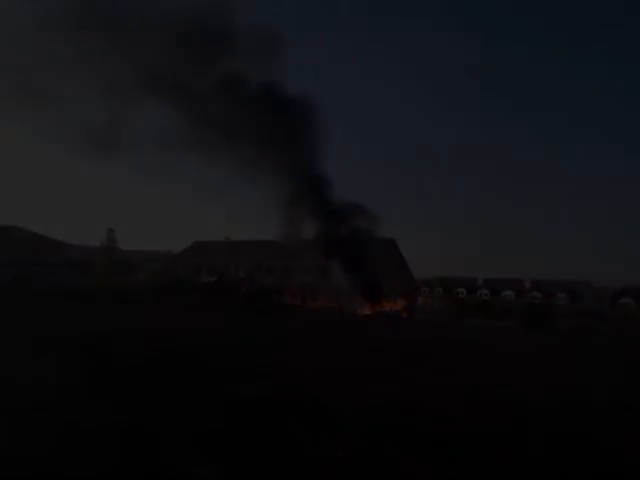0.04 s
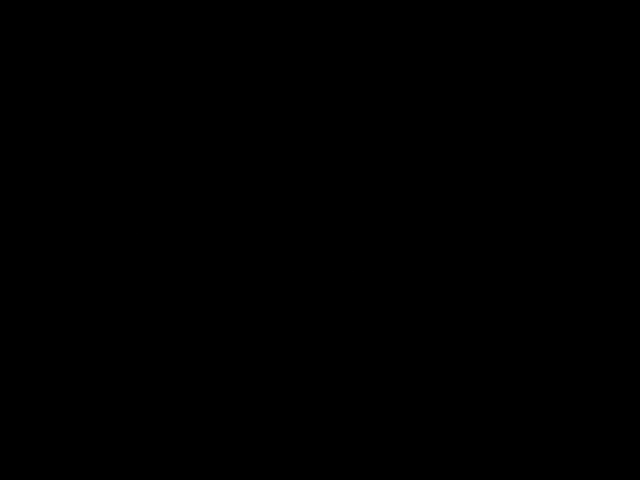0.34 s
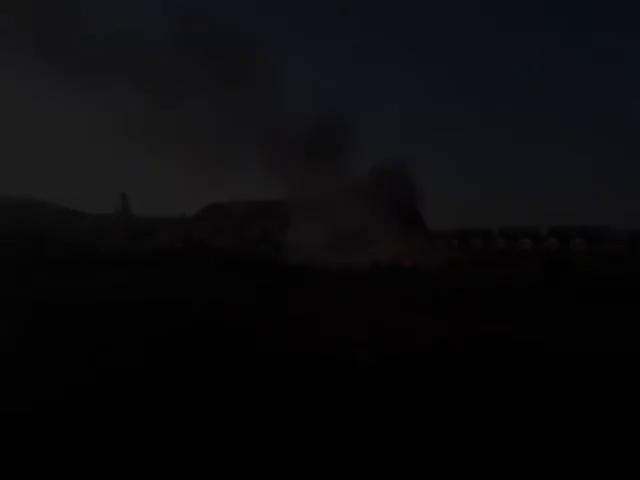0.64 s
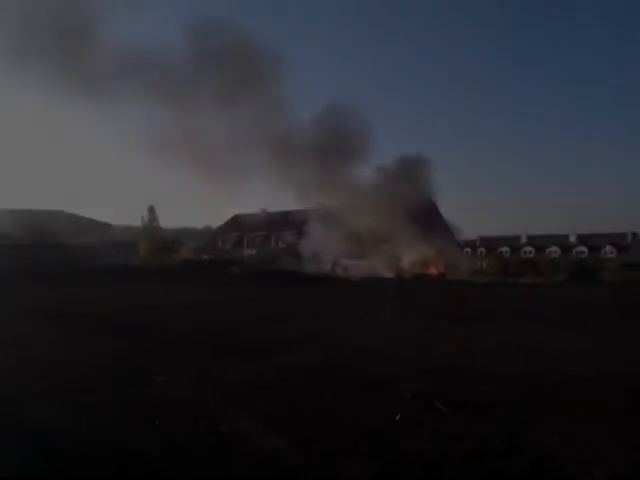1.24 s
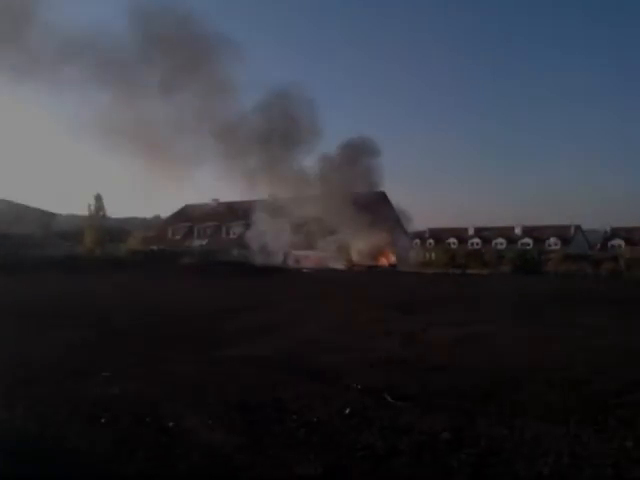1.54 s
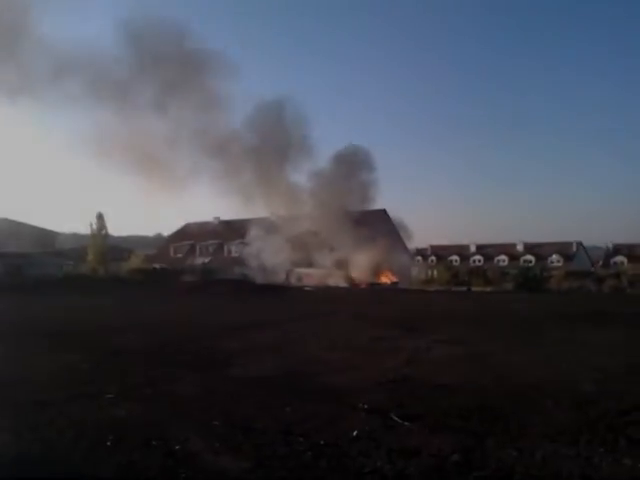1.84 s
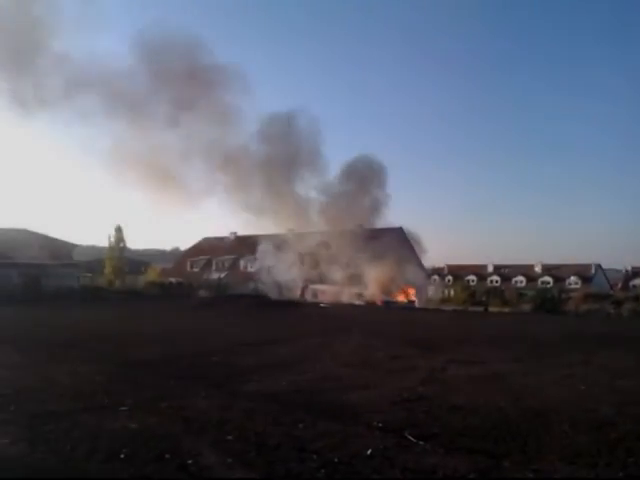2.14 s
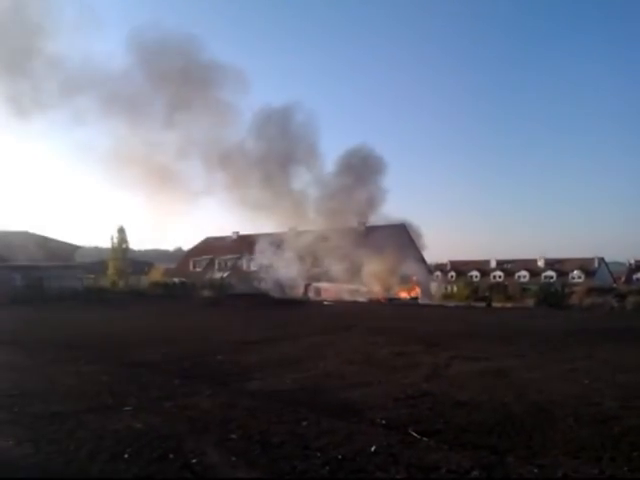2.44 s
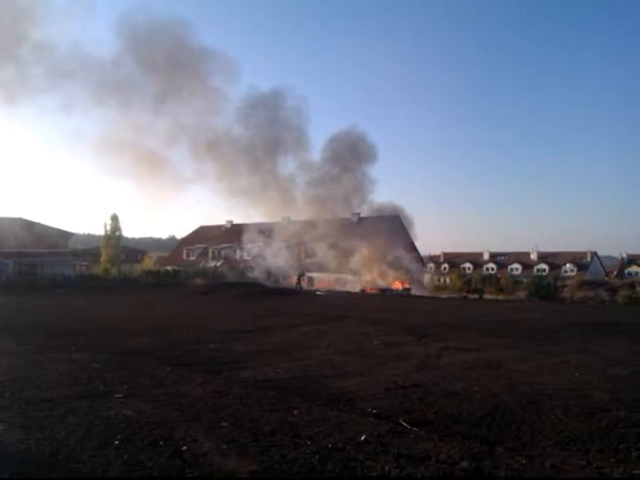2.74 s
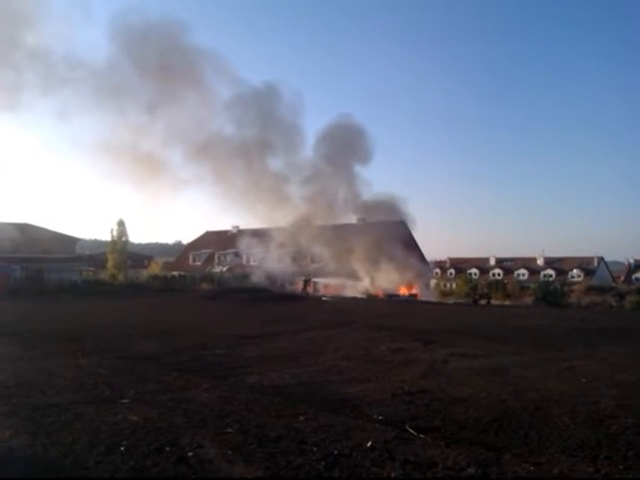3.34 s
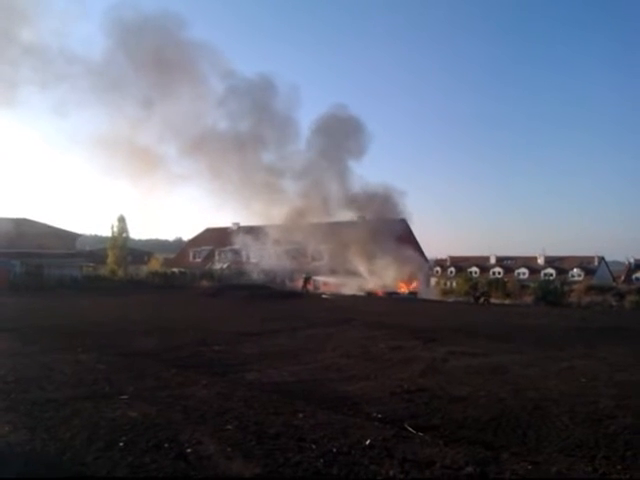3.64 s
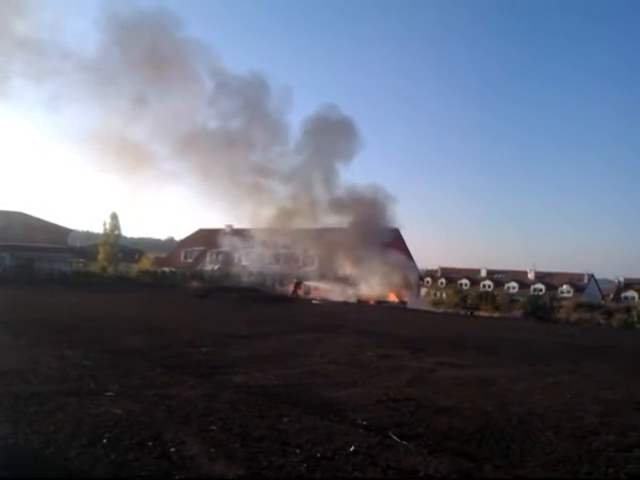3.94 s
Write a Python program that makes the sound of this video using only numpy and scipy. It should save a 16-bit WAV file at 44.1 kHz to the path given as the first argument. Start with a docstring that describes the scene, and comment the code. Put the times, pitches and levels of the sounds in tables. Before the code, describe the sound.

A diesel pump engine is heard from across a field. A brief, quiet outdoor rumble fades out first; then the engine rises into a steady rattling roar with a high whine, over faint wind and a few tiny rustles.

```python
"""A diesel, probably a fire pump, runs at a steady high speed across a field from a burning building.
Six cylinders knock out a clatter that repeats every cycle, over strong tones, rattling metal and a
rushing roar. The pump whines, and its hum beats against the exhaust in a low throb; wind rumbles faintly.
A quieter outdoor rumble with a thump and far crackles fades out first, then the engine fades in.
A few brief rustles and one tick sit on top."""
import sys
import numpy as np
from scipy import signal
from scipy.fft import rfft, irfft
from scipy.io import wavfile
from scipy.ndimage import uniform_filter1d

SR = 44100
rng = np.random.default_rng(int(sys.argv[2]) if len(sys.argv) > 2 else 0)


def inscribe(sig):
    """Save sig as 16-bit PCM at rate SR to the path in sys.argv[1].

    A 1-D sig is mono; a 2-D sig holds one channel per row.
    Samples are clipped to [-1, 1] before scaling.
    """
    pcm = np.round(np.clip(np.atleast_2d(sig).T, -1, 1) * 32767)
    wavfile.write(sys.argv[1], SR, pcm.astype(np.int16))


N = 176400
BIN_HZ = np.arange(N // 2 + 1) * SR / N
CYCLE_HZ, CYLINDERS = 20.039, 6


def undb(db):
    """Decibels to gain."""
    return 10 ** (np.asarray(db) / 20)


def unit(x):
    """Scale to rms 1."""
    return x / np.sqrt(np.mean(x ** 2))


def gain_at(hz, curve):
    """Gain of a (Hz, dB) curve on a log-frequency axis."""
    f, db = np.array(curve).T
    return undb(np.interp(np.log(np.maximum(hz, 1)), np.log(f), db))


def colour(x, curve):
    """EQ white sound of rms 1 to a (Hz, dB per Hz) curve."""
    return irfft(rfft(x) * gain_at(BIN_HZ, curve), N) * np.sqrt(SR / 2)


def walk(rate_hz, size=2048):
    """A smooth random modulator of rms 1."""
    f = BIN_HZ[:size // 2 + 1]
    slow = irfft(rfft(rng.standard_normal(size)) * np.exp(-(f / rate_hz) ** 2) * (f > 0))
    return np.interp(np.arange(N) * size / N, np.arange(size), unit(slow))


def swell(t, at, width):
    """A bell-shaped envelope."""
    return np.exp(-.5 * ((t - at) / width) ** 2)


def bursts(t, cues, curve):
    """Soft-edged bursts of noise, all of one colour."""
    noise = unit(colour(rng.standard_normal(N), curve))
    return noise * sum(undb(db) * swell(t, at, width) for at, width, db in cues)


def flicker(x, depth_db=.9):
    """Moving air makes each octave band flicker on its own."""
    octave = np.log2(np.clip(BIN_HZ, 64, 4096))
    spectrum = rfft(x)
    bands = (irfft(spectrum * np.maximum(1 - abs(octave - k), 0), N) for k in range(6, 13))
    return sum(band * undb(depth_db * walk(14)) for band in bands)


# The opening bed. Each row: frequency in Hz, pre-fade density in dB per Hz.
RUMBLE_SPECTRUM = [(20, -119), (35, -110), (60, -94), (120, -88.5), (230, -90.5), (330, -103), (480, -99),
                   (620, -93), (740, -92.5), (870, -85), (1100, -95.5), (2200, -99.5), (3200, -106),
                   (3900, -123), (4800, -121), (5800, -139), (15000, -149)]

def rumble(flicker_db=2):
    """A distant outdoor rumble whose level flickers."""
    return flicker(colour(rng.standard_normal(N), RUMBLE_SPECTRUM)) * undb(flicker_db * walk(14))


def thump(t):
    """One soft bump of low noise."""
    band = signal.butter(2, [90, 260], "bandpass", fs=SR, output="sos")
    lows = unit(signal.sosfilt(band, rng.standard_normal(N)))
    return undb(-63) * lows * swell(t, at=.037, width=.014)


# Crackle cues. Each row: centre in seconds, width in seconds, pre-fade level in dB.
CRACKLE_CUES = [(0.054, 0.0043, -62), (0.068, .008, -67), (.117, .004, -66), (.183, .004, -71),
                (0.254, 0.0073, -61)]
# Their EQ. Each row: frequency in Hz, relative gain in dB.
CRACKLE_EQ = [(400, -23), (900, -9), (1800, 1), (2500, 0), (3300, -15), (4000, -21), (6000, -50)]

def crackles(t):
    """Faint, far crackles: tiny puffs of midrange noise."""
    return bursts(t, CRACKLE_CUES, CRACKLE_EQ)


def firings(cycles, strengths, depth, decay=.5):
    """Envelope over the engine cycle: each cylinder knocks in turn and dies away."""
    slot = cycles % 1 * CYLINDERS
    knock = strengths[slot.astype(int) % CYLINDERS] * np.exp(-(slot % 1) / decay)
    return unit(1 + depth * (knock / knock.mean() - 1))


def tone(hz, clock, db, waver_db, churn=.16, churn_hz=16):
    """A sine that wavers slowly and churns quickly on its way across the field."""
    waver = waver_db * min(hz / 1000, 1) * walk(3.4)  # low tones waver less
    phase = 2 * np.pi * (hz * clock + rng.random()) + churn * walk(churn_hz)
    return np.sqrt(2) * undb(db + waver) * (1 + churn * walk(churn_hz)) * np.sin(phase)


# The engine's pitched layer. Each row: multiple of the cycle rate, pre-fade level in dB.
ENGINE_HARMONICS = [(6, -49.5), (11, -59), (13, -61), (20, -59.5), (23, -49), (25, -48), (26, -54.5),
                    (27, -53.5), (29, -46.5), (30, -45), (31, -52.5), (32, -51), (33, -45), (35, -48),
                    (36, -40.5), (39, -51.5), (40, -45), (41, -44), (42, -48), (44, -50.5), (45, -50),
                    (51, -45), (52, -51.5), (55, -52.5), (56, -49.5), (57, -50), (59, -50.5), (60, -50.5),
                    (61, -46), (63, -53.5), (64, -50.5), (67, -49), (70, -45), (72, -46.5)]

def engine_tones(t, clock):
    """Strong harmonics of the engine cycle; one slowly sinks and another grows."""
    drift_db_per_s = {29: -1.1, 36: 1.2}
    return sum(tone(m * CYCLE_HZ, clock, db + drift_db_per_s.get(m, 0) * (t - 2.7), waver_db=2)
               for m, db in ENGINE_HARMONICS)


# The body of the knocks. Each row: frequency in Hz, pre-fade density in dB per Hz.
CLATTER_SPECTRUM = [(40, -95), (100, -85), (165, -84.5), (200, -69.5), (290, -72), (380, -73.5), (550, -75),
                    (850, -70.5), (930, -68), (1150, -67.5), (1700, -68), (2200, -74), (2800, -81.5),
                    (3800, -99), (5500, -122), (8000, -150)]

def clatter(cycles, strengths, size=4096):
    """The same burst of knocks comes round each cycle; moving air shifts it between two paths."""
    grid, harmonic = np.arange(size) / size, np.arange(size // 2 + 1)
    eq = gain_at(harmonic * CYCLE_HZ, CLATTER_SPECTRUM) * np.sqrt(CYCLE_HZ / 2) * size * (harmonic > 1)
    eq[[m for m, _ in ENGINE_HARMONICS] + [2 * CYLINDERS]] = 0  # leave room for the tones and throb
    paths = []
    for _ in range(2):
        knocks = rfft(rng.standard_normal(size) * firings(grid, strengths, depth=.35))
        evened = knocks / np.sqrt(abs(knocks) * abs(knocks).mean())
        paths.append(np.interp(cycles, grid, irfft(evened * eq), period=1))
    return paths[0] + .55 * walk(.67) * paths[1]


def throb(clock, beat_hz=10.47, crest_s=1.649, waver_db=1.1, punch=.4):
    """The pump hums just above the exhaust tone at twice the firing rate; the two beat in chugs."""
    exhaust_hz = 2 * CYLINDERS * CYCLE_HZ
    since, phase = clock - crest_s, rng.random()
    exhaust, hum = (undb(db + waver_db * walk(3)) * np.sin(2 * np.pi * (hz * since + phase))
                    for hz, db in [(exhaust_hz, -50), (exhaust_hz + beat_hz, -49.5)])
    sharpen = 1 + punch * np.cos(2 * np.pi * beat_hz * since)
    return np.sqrt(2) * (exhaust + hum) * sharpen


def rattle(t, cycles, strengths, ring_hz=2640, scatter_db=3.5, fall_db_per_s=2):
    """Each firing shakes loose metal, unevenly, into one broad ring."""
    shakes = rng.standard_normal(N) * firings(cycles, strengths, depth=.45)
    shakes *= undb(scatter_db * walk(CYCLE_HZ))
    b, a = signal.iirpeak(ring_hz, Q=ring_hz / 800, fs=SR)
    for _ in range(3):
        shakes = signal.lfilter(b, a, shakes)
    return undb(-44 - fall_db_per_s * t) * unit(shakes)


# The broad rush under the clatter. Each row: frequency in Hz, pre-fade density in dB per Hz.
ROAR_SPECTRUM = [(20, -102), (50, -93.5), (90, -71.5), (125, -68.5), (165, -71), (250, -71), (400, -70.5),
                 (520, -66.5), (900, -65.5), (1350, -64), (2000, -65), (2600, -73), (3200, -85),
                 (3900, -99), (5400, -115), (5750, -128), (6800, -122), (8000, -130), (12000, -135),
                 (13500, -122), (14500, -123), (15300, -135)]

def roar(cycles, strengths, flicker_db=.4):
    """Fan, exhaust gas and water rush together, pulsing lightly with the firings."""
    gas = rng.standard_normal(N) * firings(cycles, strengths, depth=.13) * undb(flicker_db * walk(14))
    return flicker(colour(gas, ROAR_SPECTRUM))


# The bright edge above the roar. Each row: frequency in Hz, pre-fade density in dB per Hz.
HISS_SPECTRUM = [(1000, -120), (2500, -84.5), (3300, -81), (3900, -94.5), (4300, -94.5), (4850, -96),
                 (5450, -104.5), (5720, -128), (8000, -155)]

def hiss(cycles, strengths, flutter_db=1.8):
    """A thin hiss that flutters and pulses with the firings."""
    pulsing = rng.standard_normal(N) * firings(cycles, strengths, depth=.2)
    return colour(pulsing, HISS_SPECTRUM) * undb(flutter_db * walk(35))


# The engine's fader ride. Each row: time in seconds, gain in dB.
ENGINE_RIDE = [(.45, -0.5), (1.3, 0.15), (1.5, 1.2), (1.65, 0.8), (1.85, 0), (2.15, -0.07), (2.65, 0),
               (3, -0.7), (3.5, -1.73), (4, -2.14)]

def engine(t, speed_wander=.00027, cylinder_spread_db=3):
    """The diesel: all its layers follow one near-steady clock, and its cylinders fire unequally hard."""
    clock = np.cumsum(1 + speed_wander * walk(1.6)) / SR
    cycles = CYCLE_HZ * clock
    strengths = undb(cylinder_spread_db * rng.standard_normal(CYLINDERS))
    mix = engine_tones(t, clock) + clatter(cycles, strengths) + throb(clock)
    mix += rattle(t, cycles, strengths) + roar(cycles, strengths) + hiss(cycles, strengths)
    return mix * undb(np.interp(t, *np.array(ENGINE_RIDE).T))


# The pump's high tones. Each row: pitch in Hz, pre-fade level in dB.
PUMP_WHINES = [(1267, -39.5), (1756.3, -48.5), (2534, -55)]

def pump_whines(speed_wander=.00051):
    """The pump and its drive whine at a near-steady pitch."""
    clock = np.cumsum(1 + speed_wander * walk(5.3)) / SR
    return sum(tone(hz, clock, db, waver_db=3.5) for hz, db in PUMP_WHINES)


# Low wind rumble. Each row: frequency in Hz, pre-fade density in dB per Hz.
WIND_SPECTRUM = [(20, -102), (40, -86.5), (62, -74), (90, -75.5), (160, -90.5), (400, -110), (2000, -160)]

def wind(gust_db=2):
    """Light gusts buffet the microphone."""
    return colour(rng.standard_normal(N), WIND_SPECTRUM) * undb(gust_db * walk(1.7))


# Rustle cues. Each row: centre in seconds, width in seconds, level in dB.
RUSTLE_CUES = [(2.143, 0.014, -49.5), (2.22, 0.0056, -43.5), (3.308, .005, -47), (3.542, 0.0066, -50)]
# Their EQ. Each row: frequency in Hz, relative gain in dB.
RUSTLE_EQ = [(1500, -10.5), (2800, -6), (3400, 7.5), (4000, -8), (4800, -6.5), (5800, -56.5), (12000, -62)]

def rustles(t):
    """Brief brushes of bright noise."""
    return bursts(t, RUSTLE_CUES, RUSTLE_EQ)


def tick(at_s=2.4221):
    """One tiny, dry, bright click: a high-passed impulse."""
    impulse = np.zeros(N)
    impulse[int(at_s * SR)] = undb(-25.5)
    return signal.sosfilt(signal.butter(2, 4400, "highpass", fs=SR, output="sos"), impulse)


def scene():
    """The opening bed fades to silence, then engine, pump and wind fade in."""
    t = np.arange(N) / SR
    fade_out = np.clip((.404 - t) / .36, 0, 1)
    fade_in = np.clip((t - .42) / 1.94, 0, 1)
    opening = thump(t) + rumble() + crackles(t)
    field = engine(t) + pump_whines() + wind()
    return (fade_out * opening + fade_in * field + rustles(t) + tick())[None]


def record(dry, dip_s=1.0575, dip_length_s=.007, dip_db=-16, top_hz=15700):
    """The level dips once for a few milliseconds; a steep low-pass trims the top."""
    in_dip = abs(np.arange(N) / SR - dip_s) < dip_length_s / 2
    dip = undb(dip_db * uniform_filter1d(1. * in_dip, size=64))
    return signal.sosfilt(signal.ellip(8, .2, 70, top_hz, fs=SR, output="sos"), dry * dip)


dry = scene()
out = record(dry)
inscribe(out)
```